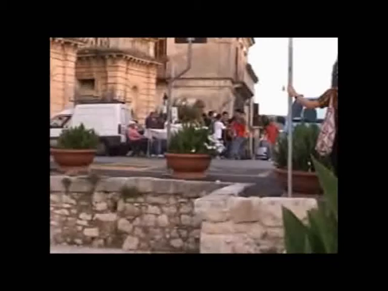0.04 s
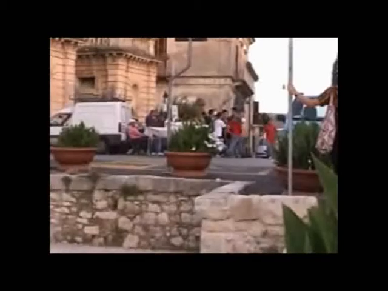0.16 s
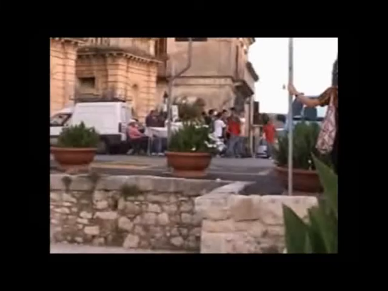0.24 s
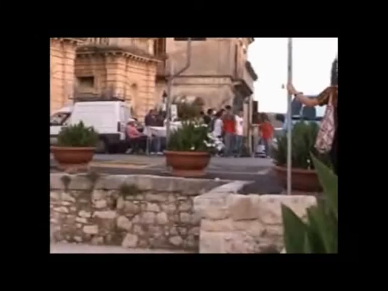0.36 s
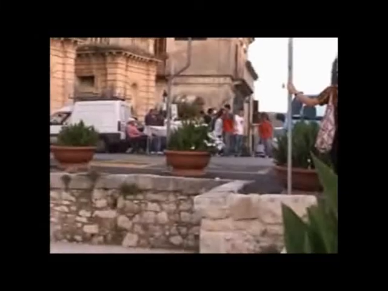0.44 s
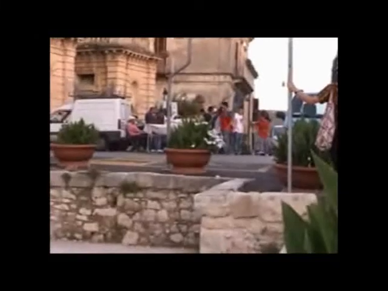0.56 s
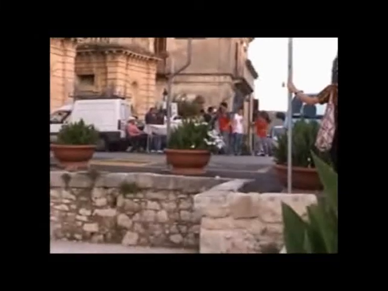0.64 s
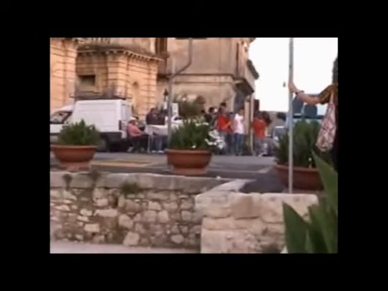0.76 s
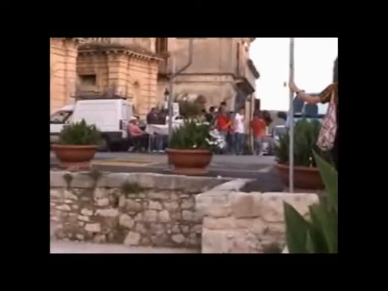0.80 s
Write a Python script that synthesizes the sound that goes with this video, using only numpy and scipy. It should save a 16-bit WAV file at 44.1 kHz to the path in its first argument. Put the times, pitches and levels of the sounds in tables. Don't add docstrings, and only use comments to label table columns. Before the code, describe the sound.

A skateboard rolls across a stone town square, its hollow wooden deck clattering over grit and cracks, bearings hissing and trucks chattering, brighter at first, with faint wall reflections and low wind in stereo.

```python
import sys
import numpy as np
from scipy import signal
from scipy.fft import rfft, irfft
from scipy.io import wavfile
from scipy.ndimage import uniform_filter1d

SR = 44100
rng = np.random.default_rng(int(sys.argv[2]) if len(sys.argv) > 2 else 0)


def digitize_waveform(pressure):
    field = np.atleast_2d(pressure).T
    bounded = np.clip(field, -1, 1)
    quanta = np.round(bounded * 32767).astype(np.int16)
    wavfile.write(sys.argv[1], SR, quanta)


def convert_level_to_amplitude(level_db):
    exponent = np.asarray(level_db, float) / 20
    return 10 ** exponent


N = 102753


def rms_one(x):
    return x / np.sqrt(np.mean(x ** 2) + 1e-20)


def in_time(rows):
    return np.interp(np.arange(N) / SR, *np.transpose(rows))


def at_hz(points, hz):
    p = np.array(points)
    return np.interp(np.log(np.maximum(hz, 1)), np.log(p[:, 0]), p[:, 1])


def colour(x, gain):
    return irfft(rfft(x) * gain(np.arange(N // 2 + 1) * SR / N), N)


def drift(rate_hz):
    step, settle = 40, 2000
    r = np.exp(-2 * np.pi * rate_hz * step / SR)
    noise = rng.standard_normal(N // step + settle + 2)
    slow = signal.lfilter([1], [1, -2 * r, r * r], noise)[settle:]
    return np.interp(np.arange(N) / step, np.arange(len(slow)), rms_one(slow - slow.mean()))


def flutter(rate_hz):
    x = drift(rate_hz)
    return rms_one(x - uniform_filter1d(x, size=SR // 14))


def grains(per_s, spread_db):
    size = convert_level_to_amplitude(spread_db * np.minimum(rng.exponential(1, N), 5))
    sign = rng.choice([-1, 1], N)
    return size * sign * (rng.random(N) < per_s / SR)


def struck(rows):
    clicks = np.zeros(N)
    s, db = np.transpose(rows)
    clicks[(s * SR).astype(int)] = convert_level_to_amplitude(db)
    return clicks


def resonate(force, modes, patchy_db, tilt=0, bend=0):
    out = 0
    for k, (hz, width_hz, db) in enumerate(modes):
        r = np.exp(-np.pi * width_hz / SR)
        b = (1 - r * r) / 2 * np.array([1, 0, -1])
        a = [1, -2 * r * np.cos(2 * np.pi * hz / SR), r * r]
        octaves = np.log2(hz / 900)
        level_db = db + patchy_db * drift(6.0) + tilt * octaves + bend * octaves ** 2
        out = out + (-1) ** k * convert_level_to_amplitude(level_db) * signal.lfilter(b, a, force)
    return out


# frequency in Hz, level in dB per Hz.
WIND_COLOUR = [(30, -4), (75, -3), (113, -1), (240, 2), (330, -18.5)]
# time in seconds, level in dB.
GUSTS = [(.19, -70.5), (.31, -75), (.34, -98), (.42, -76), (.56, -79), (.6, -78.5), (.79, -73.5),
         (1.03, -80), (1.12, -71.5), (1.24, -74), (1.36, -78.5), (1.5, -78.5), (1.61, -83), (1.65, -73),
         (1.75, -78), (1.86, -72), (2.15, -74.5), (2.32, -73)]


def wind():
    def low(hz):
        return convert_level_to_amplitude(at_hz(WIND_COLOUR, hz)) / (1 + (hz / 500.0) ** 4) / (1 + (20 / (hz + 1)) ** 2)

    each = np.array([colour(rng.standard_normal(N), low) * convert_level_to_amplitude(2.2 * drift(5.4)) for _ in range(2)])
    each = each + 0.13 * each[::-1]
    return convert_level_to_amplitude(6 + in_time(GUSTS)) * rms_one(each)


# delay in seconds, level in dB.
ECHOES = [
    (.09, -2.5),
]
# frequency in Hz, level in dB.
WALL_COLOUR = [(200, -29), (360, -16), (650, -21), (1190, -13.5), (2160, -10.5), (3500, -7), (5000, -20),
               (12000, -16)]
# time in seconds, level in dB.
NEAR_WALL = [(.19, -2), (.3, 0), (.36, 3), (.42, -1), (.45, 7), (.52, -2), (.54, -20), (2.33, -12)]


def walls(board):
    def treble_part(hz):
        return 1 / (1 + (4300.0 / (hz + 1)) ** 8)

    wet = sum(convert_level_to_amplitude(db) * np.roll(board, int(s * SR)) for s, db in ECHOES)
    body = colour(wet, lambda hz: convert_level_to_amplitude(at_hz(WALL_COLOUR, hz)) * (1 - treble_part(hz)))
    treble = colour(wet, lambda hz: convert_level_to_amplitude(at_hz(WALL_COLOUR, hz)) * treble_part(hz))
    return body + convert_level_to_amplitude(in_time(NEAR_WALL)) * treble


# time in seconds, peak in dB.
CRACKS = [(0.1965, -36), (0.242, -34), (0.284, -41), (0.293, -39), (0.343, -42), (0.389, -36), (0.406, -38),
          (0.413, -39), (0.995, -42), (1.182, -39), (1.238, -43), (1.351, -43), (1.43, -44), (1.549, -44),
          (1.584, -43), (1.612, -42), (1.675, -43), (2.21, -42), (2.28, -43)]


def crack_force():
    t60_s, level_db = 0.008, -3
    decay = convert_level_to_amplitude(-60 / (t60_s * SR))
    envelope = signal.lfilter([1], [1, -decay], struck(CRACKS) * convert_level_to_amplitude(level_db))
    return envelope * rng.standard_normal(N)


# frequency in Hz, level in dB per Hz.
HISS_COLOUR = [(3000, 2.5), (5100, -9.5), (6000, -13.5), (9000, -16.5), (12800, -16.5)]
# time in seconds, level in dB.
ROUGH = [(.19, -56.5), (.34, -53.5), (.42, -54.5), (.435, -60), (.55, -58), (.6, -59), (.75, -57.5),
         (.85, -62.5), (.98, -57.5), (1.06, -61), (1.17, -58), (1.22, -60), (1.36, -59), (1.47, -59.5),
         (1.64, -57.5), (1.78, -60), (1.95, -58), (2.11, -63.5), (2.22, -58.5)]


def hiss_and_ticks(bump, cracks):
    def bright(hz):
        return convert_level_to_amplitude(at_hz(HISS_COLOUR, hz)) / (1 + (3610.0 / (hz + 1)) ** 6)

    rattle_share = 0.063
    rattle = rattle_share * rms_one(grains(per_s=26000, spread_db=3.2))
    bearings = np.sqrt(1 - rattle_share ** 2) * rng.standard_normal(N)
    hiss = colour((rattle + bearings) * convert_level_to_amplitude(0.35 * bump + 1.1 * flutter(48.0)), bright)
    gain = 1 / np.sqrt(np.mean(hiss ** 2))
    ticks = gain * colour(cracks, bright)
    return convert_level_to_amplitude(in_time(ROUGH) + 4.0) * gain * hiss + ticks


# frequency in Hz, width in Hz, level in dB.
TRUCKS = [
    (4260, 720, 4.5),
    (7350, 970, -2.5),
]
# time in seconds, level in dB.
CHATTER = [(.19, -56.5), (.41, -57), (.44, -84), (.73, -66), (.97, -64), (.99, -58), (1.12, -68),
           (1.15, -57), (1.185, -61), (1.21, -70), (1.24, -60), (1.41, -59.5), (1.43, -53), (1.46, -72),
           (1.55, -58), (1.83, -88), (1.95, -71), (2.08, -69)]


def truck_chatter():
    knocks = grains(per_s=2200.0, spread_db=4.7)
    return convert_level_to_amplitude(in_time(CHATTER)) * rms_one(resonate(knocks, TRUCKS, patchy_db=2.5))


# time in seconds, peak in dB.
SLAPS = [(0.2423, -22.5), (0.2549, -22.8), (0.2653, -24.0), (0.2848, -23.6), (0.2937, -22.3),
         (0.3627, -23.4), (0.3957, -23.4), (0.4056, -22.4), (0.4206, -23.0), (0.4341, -22.7),
         (0.4535, -22.9), (0.4699, -23.2), (0.4784, -23.3), (0.6069, -23.6), (0.6428, -24.5),
         (0.6542, -24.0), (0.6884, -23.1), (0.7125, -23.9), (0.7721, -22.6), (0.782, -23.6),
         (0.8216, -23.5), (0.8464, -22.6), (0.8678, -23.7), (0.877, -22.8), (0.8893, -22.5),
         (0.9198, -23.0), (0.9784, -24.4), (1.0115, -24.0), (1.0626, -23.9), (1.0711, -22.7),
         (1.1075, -22.3), (1.1416, -23.4), (1.1822, -22.2), (1.2596, -23.7), (1.323, -23.8),
         (1.5064, -22.3), (1.5366, -23.0), (1.5493, -21.9), (1.6047, -23.4), (1.6201, -24.6),
         (1.6751, -22.6), (1.7511, -23.7), (1.8443, -24.0), (1.8782, -23.5), (1.8907, -23.0),
         (1.9127, -23.3), (2.0028, -22.3), (2.0297, -24.0), (2.0629, -22.7), (2.0807, -24.8),
         (2.095, -22.9), (2.1411, -23.1), (2.1656, -24.1), (2.1749, -24.3), (2.2152, -22.6),
         (2.2396, -23.6), (2.2882, -23.9), (2.3296, -25.2)]


def slaps():
    swing_hz, swing_s, skip_s, skip_db = 1150, 0.00045, 0.001, -14
    t = np.arange(-200, 201) / SR
    swing = np.exp(-(t / swing_s) ** 2) * np.cos(2 * np.pi * swing_hz * t)
    clicks = struck(SLAPS)
    skip = np.convolve(clicks > 0, np.exp(-(t / skip_s) ** 2), "same")
    return np.convolve(clicks, swing, "same"), convert_level_to_amplitude(skip_db * np.minimum(skip, 1))


# frequency in Hz, width in Hz, level in dB.
DECK = [(395, 116.6, -5), (544, 164, -1.5), (663.5, 162, 0), (950, 260.5, -0.5), (1143, 136, 0.5),
        (1254, 89, -0.5), (1339, 154, -1), (1485, 177, -6), (1880, 280, -7), (2144, 1270, -14),
        (2990, 2300, -25.5)]
# time in seconds, tilt in dB per octave.
HARD = [(.19, 0.8), (.25, 1), (.33, 0), (.47, -0.5), (.5, 1), (.56, -1), (.62, -1), (.69, 0), (.76, -1),
        (.94, 0.8), (1.04, -0.5), (1.16, 1.5), (1.2, -1), (1.28, 0), (1.42, 0), (1.6, 0.2), (1.75, -0.2),
        (2.3, -0.2)]
# time in seconds, bend in dB per octave
WEIGHT = [(.19, 1), (.25, 0), (.33, 0.5), (.48, 0), (.56, 0), (.63, 1), (.72, 0.5), (.85, 0.5), (.98, 1),
          (1.05, 0.5), (1.16, -0.5), (1.3, -1.5), (1.45, 0.5), (1.6, 0.5), (1.75, 0), (1.9, -0.5), (2.1, 0),
          (2.3, 0)]


def deck(force):
    body = resonate(force, DECK, patchy_db=0.23, tilt=in_time(HARD), bend=in_time(WEIGHT))
    return signal.sosfilt(signal.butter(4, 213, "high", fs=SR, output="sos"), body)


# time in seconds, level in dB.
ROLL = [(0.19, -35), (0.33, -31.5), (0.84, -33), (0.85, -23.5), (0.85, -36.5), (0.89, -32.5), (0.9, -37),
        (0.92, -34.5), (1.18, -33), (1.19, -36), (1.26, -32.5), (1.36, -32.5), (1.38, -34.5), (1.55, -32),
        (1.56, -36), (1.61, -32.5), (2.24, -32.5), (2.32, -32)]


def rolling(bump, cracks):
    rough_db = in_time(ROUGH)
    grit = rms_one(grains(per_s=3500, spread_db=2.58)) * convert_level_to_amplitude(0.48 * bump)
    load = convert_level_to_amplitude(in_time(ROLL) + 0.032 * (rough_db - rough_db.mean()))
    slap, skip = slaps()
    force = grit * load + convert_level_to_amplitude(-8) * cracks
    return convert_level_to_amplitude(17) * skip * deck(force) + slap


def wheels():
    bump, cracks = flutter(50.0), crack_force()
    return rolling(bump, cracks) + hiss_and_ticks(bump, cracks) + truck_chatter()


# frequency in Hz, difference in dB.
LEAN = [(300, 0.4), (700, -0.25), (1500, 1.5), (2500, 2.5), (5000, -0.4)]


def scene():
    peak = 0.089
    board = peak * np.tanh(wheels() / peak)
    board = colour(board, lambda hz: 1 / (1 + (204 / (hz + 1)) ** 4))
    side = walls(board)
    left = colour(board, lambda hz: convert_level_to_amplitude(at_hz(LEAN, hz) / 2))
    right = colour(board, lambda hz: convert_level_to_amplitude(-at_hz(LEAN, hz) / 2))
    return np.array([left + side, right - side]) + wind()


def band_limit(x):
    return signal.sosfilt(signal.butter(12, 13530, fs=SR, output="sos"), x)


def record(dry):
    start_s, fade_s, cutoff_hz = 0.1735, 0.013, 12760

    def top_cut(hz):
        return 1 / (1 + np.exp(np.clip((hz - cutoff_hz) / 25.0, -50, 50)))

    gate = np.clip((np.arange(N) / SR - start_s) / fade_s, 0, 1) ** 0.5
    mix = np.array([colour(channel, top_cut) for channel in dry]) * gate
    return band_limit(mix)


dry = scene()
out = record(dry)
digitize_waveform(out)
```